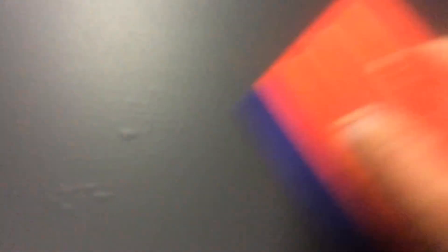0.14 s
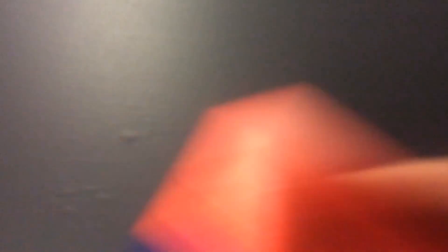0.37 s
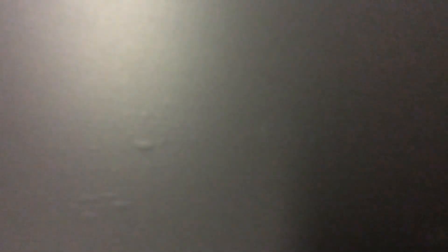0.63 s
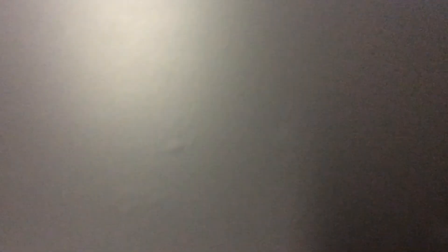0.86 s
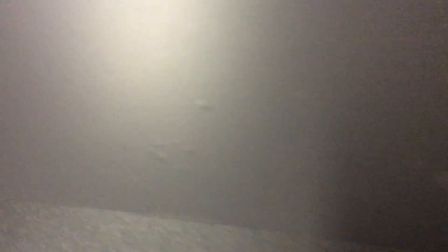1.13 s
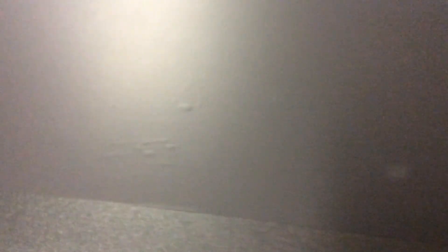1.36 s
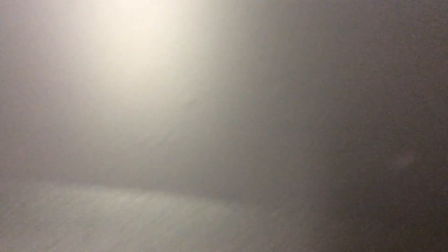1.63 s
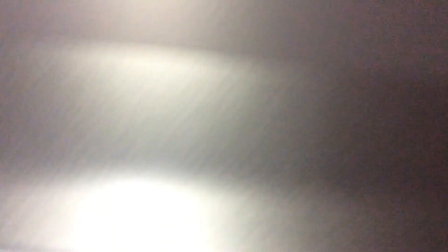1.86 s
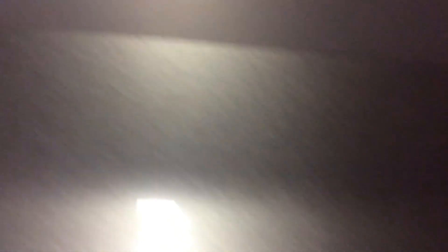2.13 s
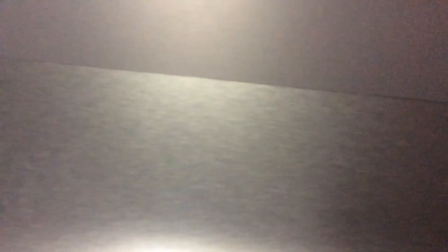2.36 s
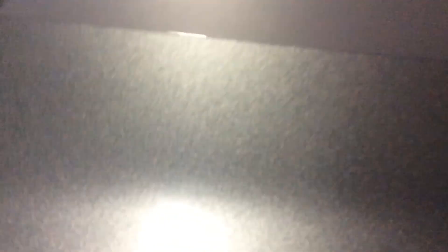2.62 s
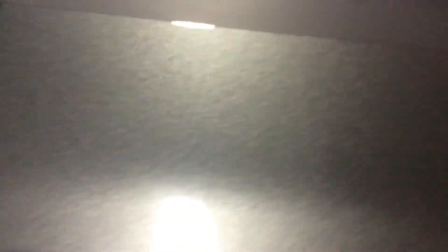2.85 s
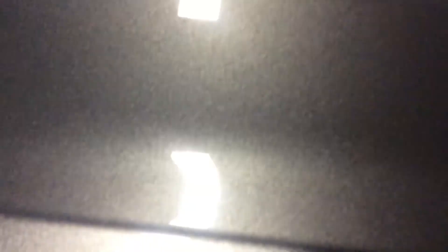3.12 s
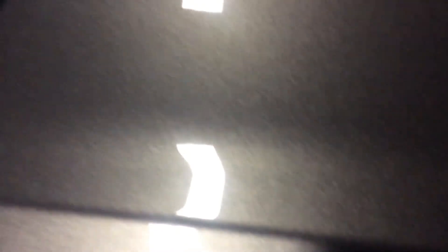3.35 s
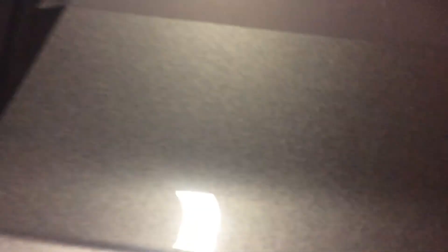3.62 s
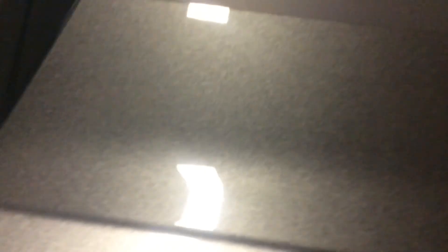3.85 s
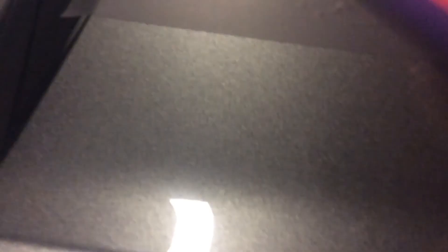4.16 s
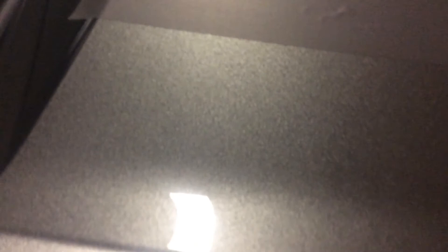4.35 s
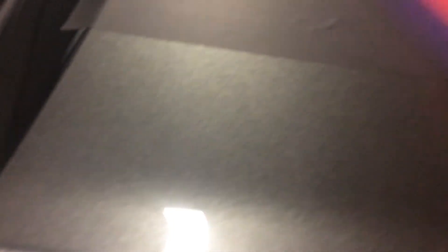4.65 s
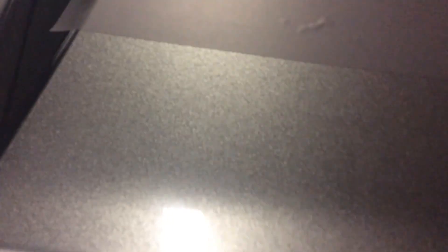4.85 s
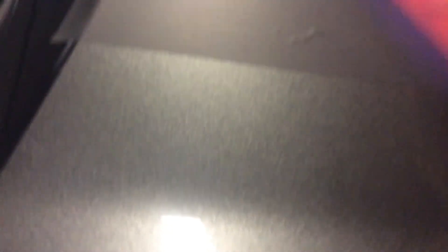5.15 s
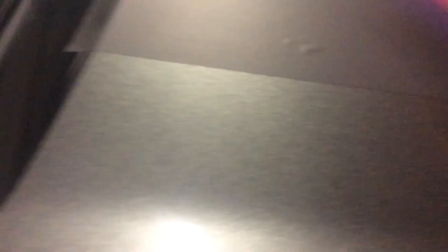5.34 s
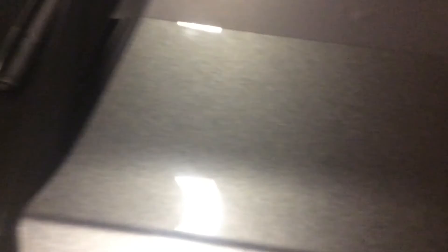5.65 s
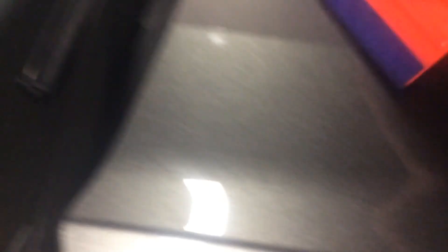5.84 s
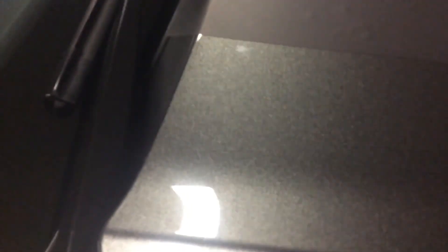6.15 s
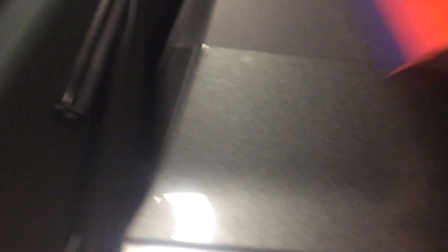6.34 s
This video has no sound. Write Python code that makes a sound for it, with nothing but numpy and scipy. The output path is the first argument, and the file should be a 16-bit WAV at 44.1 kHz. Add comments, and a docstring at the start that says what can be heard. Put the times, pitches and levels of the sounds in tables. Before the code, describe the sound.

After one dull scrape and a pause of camera rumble and bumps, a squeegee thumps and swishes repeatedly across film on a hollow car panel.

```python
"""A plastic squeegee smooths vinyl film onto a car panel in a workshop, close to a hand-held mono camera.
A dull first stroke opens; in the pause after it the moving camera rumbles, bumps and ticks.
Seven more strokes follow: each lands with a hollow thump of the sheet metal's ringing modes, then hisses
as shaped noise that brightens while the blade gathers speed. The film snaps, as sharp impulses, under the
first three of these. A few bumps go on among the strokes, over room echo, hand rumble and faint room tone."""
import sys
import numpy as np
from scipy import signal
from scipy.fft import rfft, irfft, next_fast_len
from scipy.io import wavfile
from scipy.ndimage import uniform_filter1d, map_coordinates

SR = 44100
rng = np.random.default_rng(int(sys.argv[2]) if len(sys.argv) > 2 else 0)


def generate_wav(signal):
    """Clip the signal to [-1, 1] and save it as 16-bit WAV at the path in sys.argv[1]."""
    frames = np.transpose(np.atleast_2d(signal))
    scaled = np.clip(frames, -1, 1) * 32767
    pcm = np.round(scaled).astype(np.int16)
    wavfile.write(sys.argv[1], SR, pcm)


N = 285768  # length in samples

# tone of the blade's rub before speed tilts it: freq_hz, density_db (per Hz, relative)
RUB_COLOUR = [(150, -17.5), (600, -21.5), (900, -22.5), (1400, -15.5), (1750, -19), (2750, -7), (3500, -9),
              (4600, 2.5), (5400, -4.5), (6300, 0), (8000, -6.5), (11000, -10), (13500, -10.5),
              (15000, -8.5)]


def rub(trim_db=4, grain_rate_hz=5000, grain_db=-3, judder_db=-0.3, drag_db=1.34, lean=0.48, patch_db=2.3):
    """The blade plucks countless tiny bumps of the film; faster sliding shifts their energy upwards."""
    grains = (rng.random(N) < grain_rate_hz / SR) * rng.standard_normal(N)
    friction = coloured(rng.standard_normal(N) + amp(grain_db) * unit(grains), RUB_COLOUR)
    # the edge grips unevenly, both fast and slow
    friction *= amp(judder_db * wobble(130) + drag_db * wobble(25))
    hz, t, spectra = signal.stft(friction, SR, nperseg=512)
    rub_db, bright_db = sliding(t)
    # brightness lifts the treble and thins the low end
    tilt = treble(hz) - lean * (1 - treble(hz, low_hz=1350, high_hz=3920))
    # the contact line keeps moving, so narrow resonances come and go
    patches = uniform_filter1d(rng.standard_normal(spectra.shape), size=3, axis=0)
    patches = unit(uniform_filter1d(patches, size=7, axis=1))
    gain = amp(trim_db + rub_db + tilt[:, None] * bright_db + patch_db * patches)
    return signal.istft(spectra * gain, SR, nperseg=512)[1][:N]


# strokes of the blade: start_s, length_s, wait_s (before pushing), press_s (to full pressure),
# run_up_s (to top speed), slowing_s, level_db (before the rub's trim), bright_db (at top speed)
STROKES = [(0.0, .36, 0.012, 0.11, .25, 0.053, -37.5, -7),
           (2.503, 0.34, 0.053, 0.059, 0.22, 0.032, -35.5, 0),
           (3.192, 0.41, 0.0029, 0.046, 0.33, 0.045, -37, 0.5),
           (3.874, 0.3, 0, 0.033, 0.2, 0.055, -36.5, 1), (4.479, .27, 0, 0.023, 0.16, 0.047, -37, 1),
           (5.02, 0.27, 0.0024, 0.053, 0.19, 0.059, -37.5, 1.5),
           (5.571, .28, 0, .04, 0.19, 0.036, -38, 1.5), (6.151, .31, 0.00096, 0.052, 0.25, 0.062, -37, 1.5)]
TOUCH_SPEED, LIFT_SPEED = 0.25, 0.62  # shares of the top speed as the blade lands and as it leaves
SPEED_LAW = 0.75  # the rub's amplitude grows as this power of the speed
DULL_DB = 27.5  # brightness lost between top speed and rest
LIGHT_DB = 9  # the first touch is this much softer than full pressure
LIFT_DB_PER_S = 899  # the rub dies as the blade leaves the film
TOUCH_BRIGHT_DB, TOUCH_S = 11, 0.0091  # bright puff as the edge meets the film, and its 1/e decay
SILENT_DB = -120


def sliding(t):
    """Level and brightness of the rub in dB: the blade touches, presses in, gathers speed, slows and lifts."""
    rub_db, bright_db = np.full(len(t), float(SILENT_DB)), np.zeros(len(t))
    for start, length, wait, press, run_up, slowing, stroke_db, top_bright_db in STROKES:
        age, left = t - start, start + length - t
        push = np.sin(np.pi / 2 * ramp((age - wait) / run_up))
        speed = TOUCH_SPEED + (1 - TOUCH_SPEED) * push
        speed *= LIFT_SPEED + (1 - LIFT_SPEED) * ramp(left / slowing)
        pressure_db = -LIGHT_DB * (1 - ramp((age - wait) / press))
        lift_db = LIFT_DB_PER_S * np.minimum(left, 0)
        level_db = stroke_db + pressure_db + lift_db + SPEED_LAW * 20 * np.log10(speed)
        puff_db = TOUCH_BRIGHT_DB * np.exp(-np.abs(age / TOUCH_S))
        # each stroke takes over from the one before
        rub_db = np.where(age >= 0, np.maximum(level_db, SILENT_DB), rub_db)
        bright_db = np.where(age >= 0, top_bright_db - DULL_DB * (1 - speed) + puff_db, bright_db)
    return rub_db, bright_db


# ringing modes of the car panel, before each contact's scatter: freq_hz, level_db (relative), t60_s
PANEL_MODES = [(117, -19, 0.2), (192, -4, 0.12), (259.6, 0, 0.085), (303, 3, 0.1), (368, -6, 0.089),
               (440, -7, 0.09), (488, -4.5, 0.1), (557, -10, 0.09), (662, -13, 0.08), (773, -19.5, 0.064),
               (1056, -14.5, 0.027), (1340, -21, 0.06)]


def thumps(attack_s=0.0023, scatter_db=2, detune=0.028, clatter_db=-6, clatter_t60_s=0.076):
    """Each landing rings the panel's low modes over a blur of denser ones; a harder one wakes the upper modes."""
    out, t = np.zeros(N), np.arange(2 ** 14) / SR
    head = t < .02  # the first 20 ms set the level
    hz, mode_db, t60 = np.transpose(PANEL_MODES)[:, :, None]
    grid = np.fft.rfftfreq(len(t), 1 / SR)
    # colour of the dense modes: (Hz, dB)
    blur = [(70, -17.5), (200, 0.5), (600, 5.0), (900, -6), (1400, -12.0), (2200, -26.5), (5000, -48)]

    def upper(f):
        """0 in the low modes, rising to 1 in the upper ones."""
        return treble(f, low_hz=351, high_hz=1300)

    for start, level_db, hard_db in contacts():
        # each contact's modes get a little random scatter in level and pitch
        size, shift = rng.standard_normal((2, len(hz), 1))
        decay = amp(mode_db + scatter_db * size + hard_db * upper(hz) - 60 * t / t60)
        ring = np.sum(decay * np.sin(2 * np.pi * hz * (1 + detune * shift) * t), axis=0)
        fading_noise = rng.standard_normal(len(t)) * amp(-60 * t / clatter_t60_s)
        clatter = causal(fading_noise, along(blur, grid) + hard_db * upper(grid))
        blow = unit(ring) + amp(clatter_db) * unit(clatter)
        blow *= 1 - np.exp(-t / attack_s)
        add(out, start, amp(level_db) * blow / blow[head].std())
    return out


# landings of the squeegee: start_s, level_db (first 20 ms), hardness_db (lift of the upper modes)
LANDINGS = [(.002, -46.5, -22), (2.498, -31.5, -5.5), (3.193, -35, 2), (3.2018, -25.5, 2.5),
            (3.214, -30, -12), (3.883, -26.5, -5.5), (4.48, -43, 0), (4.489, -26, -6), (5.022, -25.5, 0),
            (5.578, -24, 3), (6.157, -31, -12)]
REBOUND_S, REBOUND_LOSS_DB = .032, 11  # average time between contacts, loss at each


def contacts(count=3, uneven=0.1524):
    """The blade chatters as it settles: each landing, then its ever softer rebounds."""
    hits = []
    for start, level_db, hard_db in LANDINGS:
        for k in range(count):
            gap = REBOUND_S * (1 + uneven * rng.uniform(-1, 1))
            hits.append((start + k * gap, level_db - k * REBOUND_LOSS_DB, hard_db))
    return hits


# the film snaps under the blade: start_s, peak_db (before the trim), brightness_db
SNAPS = [(2.7395, -9.5, 4.5), (2.7807, -12.5, -11.5), (2.7849, -6, 8), (2.7871, 0, -2.5), (2.7904, -3.5, 0),
         (2.8375, -22, 1.5), (2.855, -22.5, 5), (3.5253, 0.5, 5.5), (3.5692, -8, 2), (4.1102, -3.5, 0)]
# tone of a snap before its brightness: freq_hz, gain_db
SNAP_COLOUR = [(600, -44.5), (1700, -29.5), (2700, -6.5), (4500, 0.5), (8000, 3.5), (11000, 1.5),
               (15000, 1)]


def film_snaps():
    """The film snaps in sharp, bright cracks with a very short ring."""
    return clicks(SNAPS, SNAP_COLOUR, ring_db=-13, ring_t60_s=0.0072, trim_db=1)


# light ticks of the grip: start_s, peak_db (before the trim), brightness_db
TICKS = [(.7815, -47, 9), (1.0775, -34, -27), (1.2081, -45, 14), (1.614, -40, -4), (1.6197, -24.5, -3),
         (1.8389, -42, 11)]
# tone of a tick before its brightness: freq_hz, gain_db
TICK_COLOUR = [(1000, -15), (1700, -24), (2400, -7.5), (3100, 5), (3650, -5.5), (4750, 10), (5450, -6),
               (6900, 0.5), (10000, -20.5), (15000, -29)]


def grip_ticks():
    """The grip on the camera gives a light, brief tick with a narrower, duller tone than a snap."""
    return clicks(TICKS, TICK_COLOUR, ring_db=-2, ring_t60_s=0.012, trim_db=-2)


def clicks(rows, colour, ring_db, ring_t60_s, trim_db):
    """A sharp impulse, then a few milliseconds of scattered ringing."""
    out, t = np.zeros(N), np.arange(2 ** 11) / SR
    hz = np.fft.rfftfreq(len(t), 1 / SR)
    for start, peak_db, bright_db in rows:
        burst = amp(ring_db - 60 * t / ring_t60_s) * rng.standard_normal(len(t))
        burst[0] = 1
        click = causal(burst, along(colour, hz) + bright_db * treble(hz))
        add(out, start, amp(peak_db + trim_db) * click / np.abs(click).max())
    return out


# dull handling bumps: centre_s, peak_db, pitch_hz (nominal; the breadth sets the strongest pitch to 0.75 of it)
BUMPS = [(0.041, -34.5, 81), (0.888, -30, 150), (1.0792, -36.5, 467), (1.152, -24, 153),
         (1.206, -36.5, 160), (1.276, -32.5, 208), (1.422, -40, 50), (1.621, -45, 328), (1.798, -30.5, 136),
         (1.87, -36.5, 156), (2.077, -40, 121), (2.169, -38.5, 124), (2.283, -30.5, 260),
         (2.302, -33.5, 160), (2.566, -27.5, 170), (2.588, -29, 170), (2.689, -29.5, 200),
         (3.416, -19.5, 221), (5.217, -18, 172.3), (5.254, -33, 170), (6.153, -18, 132)]


def bumps(breadth=0.75, lead_s=.04):
    """A knock through the camera's body is one push with a dip on either side, and no ring."""
    out = np.zeros(N)
    t = np.arange(round(2 * lead_s * SR)) / SR - lead_s
    for centre, peak_db, hz in BUMPS:
        u = (np.pi * breadth * hz * t) ** 2
        push = amp(peak_db) * (1 - 3 * u) / (1 + u) ** 3
        add(out, centre - lead_s, push)
    return out


# shifts of the hand's grip on the camera: start_s, length_s, rumble_db, scuff_db, brush_db
GRIPS = [(.83, .07, -57, -73, -68), (1.075, 0.046, -39.5, -55, -56), (1.213, 0.075, -60, -50.5, -77),
         (1.13, 0.66, -52, -71.5, -72), (1.77, 0.21, -47, -71, -75.5), (2.0, 0.69, -54, -75, -88)]
HOLD_RUMBLE_DB, HOLD_SCUFF_DB = -54.5, -69.5  # a hand that merely holds the camera


def gripping(t, fullness=0.57):
    """Amplitudes of rumble, scuff and brush: each shift of the grip is one arch over the steady hold."""
    gains = amp([[HOLD_RUMBLE_DB], [HOLD_SCUFF_DB], [-np.inf]])
    for start, length, *levels_db in GRIPS:
        u = ramp((t - start) / length)
        arch = np.abs(np.sin(np.pi * u)) ** fullness * (u < 1)
        gains = np.hypot(gains, amp(levels_db)[:, None] * arch)
    return gains


# tones of the hand's rumble, scuff and brush and of the room's air: freq_hz, density_db (per Hz, relative)
RUMBLE_COLOUR = [(15, -29), (28, -10.5), (42, 1.5), (65, -2.5), (110, -6.5), (170, -22.5), (300, -37.5),
                 (2000, -84)]
SCUFF_COLOUR = [(70, 3), (170, 2.5), (400, -5), (700, -16.5), (1000, -32.5), (3000, -52)]
BRUSH_COLOUR = [(1500, -16), (3000, -8.5), (4000, -12), (4600, 6), (5600, -8), (9000, -12), (15000, -42)]
AIR_COLOUR = [(100, 1), (400, -7), (1000, -11), (2000, -19.5), (3700, -13), (7000, -19.5), (15000, -21)]


def background(air_db=-70, lumps_db=2, rough_db=3):
    """The hand rumbles, scuffs and brushes on the camera over a faint room tone."""
    def noise(colour):
        """Steady noise of one tone."""
        return coloured(rng.standard_normal(N), colour)

    sway, slip, graze = gripping(np.arange(N) / SR)
    rumble = sway * amp(lumps_db * wobble(21)) * noise(RUMBLE_COLOUR)
    scuff = slip * amp(rough_db * wobble(120)) * noise(SCUFF_COLOUR)
    brush = graze * noise(BRUSH_COLOUR)
    return rumble + scuff + brush + amp(air_db) * noise(AIR_COLOUR)


# decay of the workshop's echo: freq_hz, t60_s
ROOM_T60 = [(150, 0.75), (400, 0.64), (1200, 1.62), (4500, 1.18), (7000, 0.93), (10000, 0.61), (15000, 0.3)]
# how much sound feeds the echo: freq_hz, send_db
ROOM_SEND = [(100, -5), (300, -7), (1200, -11.5), (4500, -10.5), (8000, -11), (14000, -12.5)]


def workshop(x, delay_s=.008, count=14):
    """The hard-walled room's tail: noise in which each frequency dies at its own speed."""
    hz, t, spectra = signal.stft(rng.standard_normal((count, SR + SR // 2)), SR, nperseg=256)
    t60 = along(ROOM_T60, hz)[:, None]
    even_energy = np.sqrt(2 * np.log(1000) / (t60 * SR))  # long and short decays carry alike
    gain = amp(along(ROOM_SEND, hz)[:, None] - 60 * t / t60) * even_energy
    tails = signal.istft(spectra * gain, SR, nperseg=256)[1]
    out, start = np.zeros(N), 0
    # successive stretches of sound meet differently scattered echoes
    for stretch, tail in zip(np.array_split(x, count), tails):
        add(out, start / SR + delay_s, signal.fftconvolve(stretch, tail))
        start += len(stretch)
    return out


def amp(db):
    """Decibels to amplitude."""
    return 10 ** (np.asarray(db) / 20)


def unit(x):
    """Scaled to rms 1."""
    return x / np.sqrt(np.mean(x ** 2) + 1e-20)


def ramp(x):
    """Held between 0 and 1."""
    return np.clip(x, 0, 1)


def along(points, hz):
    """Read a curve of (Hz, value) points on a log frequency axis."""
    f, v = np.transpose(points)
    return np.interp(np.log(hz + 1), np.log(f + 1), v)


def treble(hz, low_hz=3800, high_hz=10500):
    """0 up to low_hz, rising to 1 at high_hz."""
    return ramp(np.log((hz + 1) / low_hz) / np.log(high_hz / low_hz))


def wobble(rate):
    """A smooth random curve, rate knots a second."""
    knots = rng.standard_normal(int(N * rate / SR) + 4)
    return map_coordinates(knots, [np.arange(N) * rate / SR])


def filtered(x, response):
    """x times a response of frequency."""
    m = next_fast_len(N + SR // 2)
    return irfft(rfft(x, m) * response(np.fft.rfftfreq(m, 1 / SR)), m)[:N]


def coloured(x, spectrum):
    """x shaped by a spectrum, at rms 1."""
    return unit(filtered(x, lambda hz: amp(along(spectrum, hz))))


def causal(x, gain_db):
    """A short sound shaped by a gain on its own FFT grid, minimum phase so nothing precedes its attack."""
    cepstrum = irfft(np.log(amp(gain_db)))
    half = len(cepstrum) // 2
    cepstrum[1:half] *= 2
    cepstrum[half + 1:] = 0
    return irfft(rfft(x) * np.exp(rfft(cepstrum)))


def add(track, start_s, sound):
    """Mix a sound into a track, cut at the track's end."""
    part = track[round(start_s * SR):][:len(sound)]
    part += sound[:len(part)]


def scene():
    """The work on the panel fills the room; handling sounds reach the microphone directly."""
    work = rub() + thumps()
    snaps = film_snaps()
    echo = workshop(work + amp(-4) * snaps)
    mono = work + snaps + echo + grip_ticks() + bumps() + background()
    return np.array([mono, mono])


def record(dry, top_hz=15400):
    """The camera keeps nothing above its band limit."""
    return np.array([filtered(channel, lambda hz: hz < top_hz) for channel in dry])


dry = scene()
out = record(dry)
generate_wav(out)
```